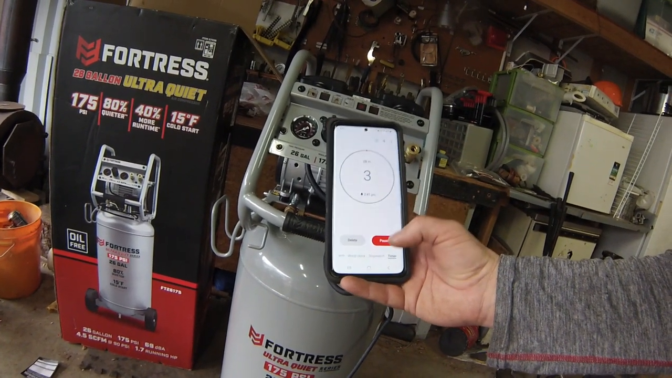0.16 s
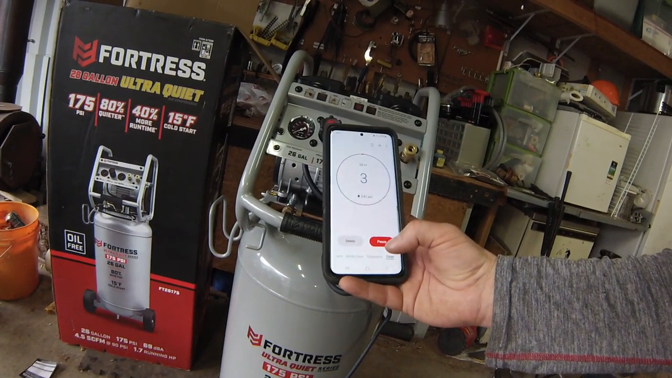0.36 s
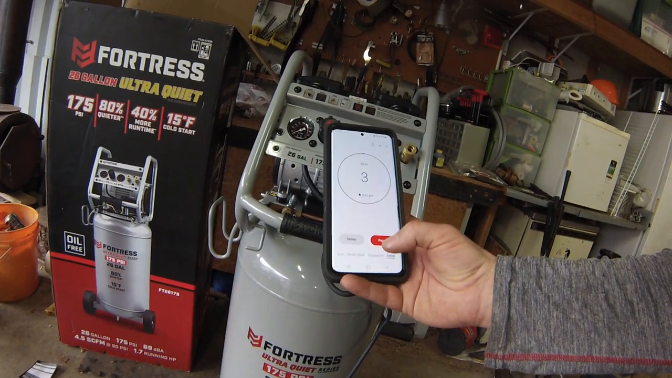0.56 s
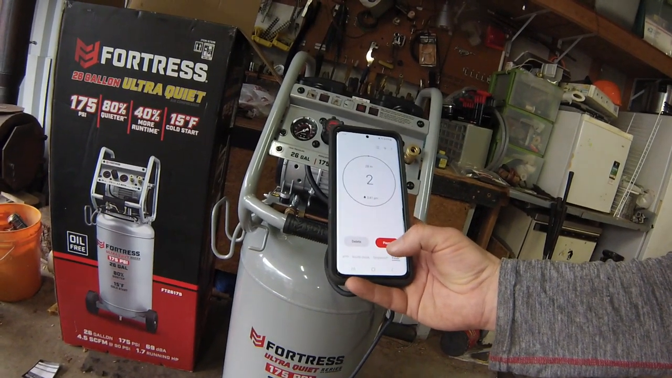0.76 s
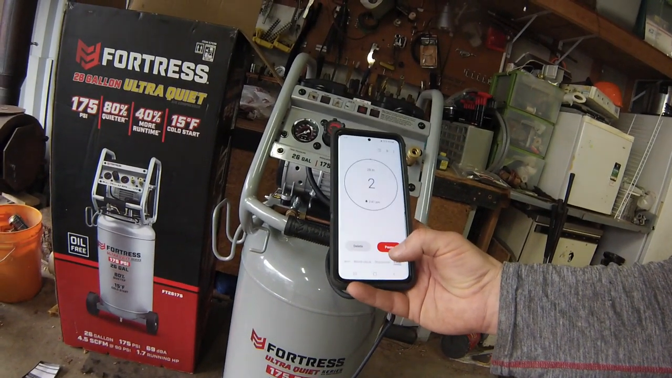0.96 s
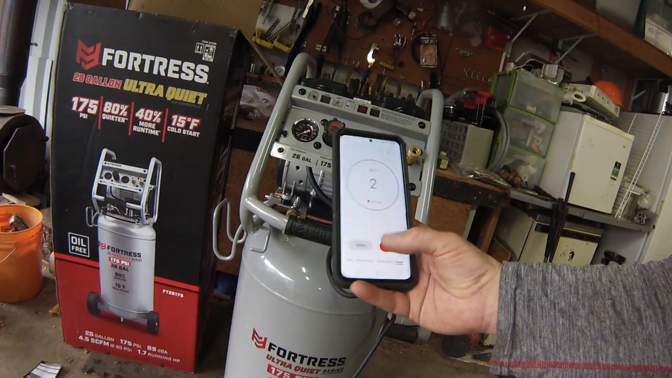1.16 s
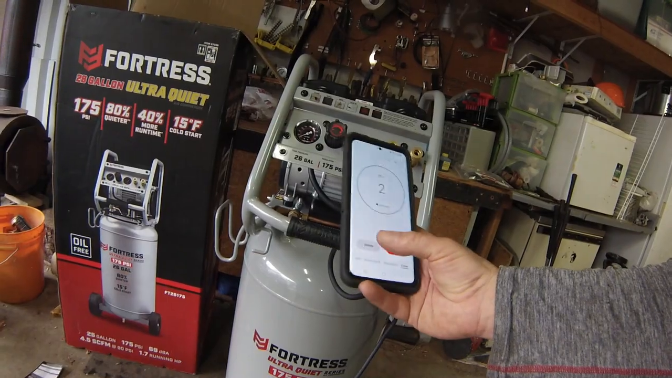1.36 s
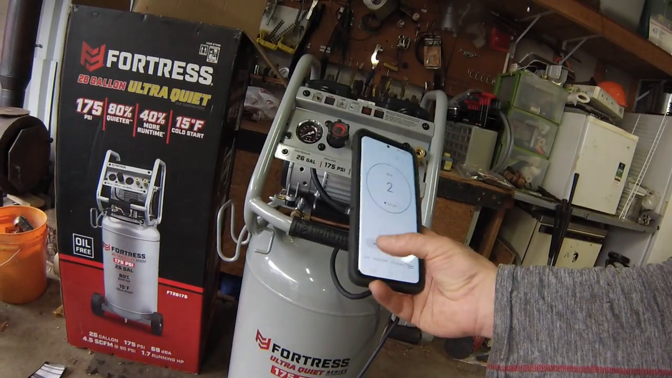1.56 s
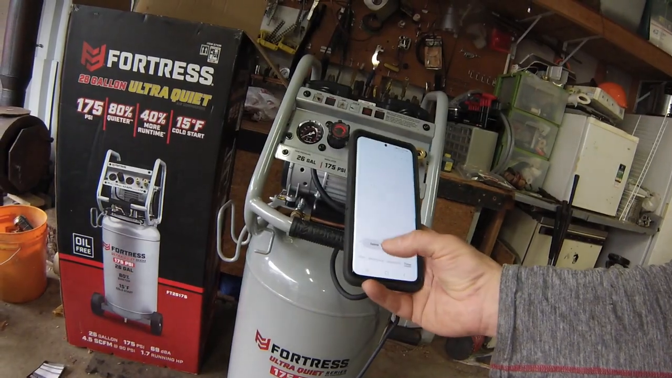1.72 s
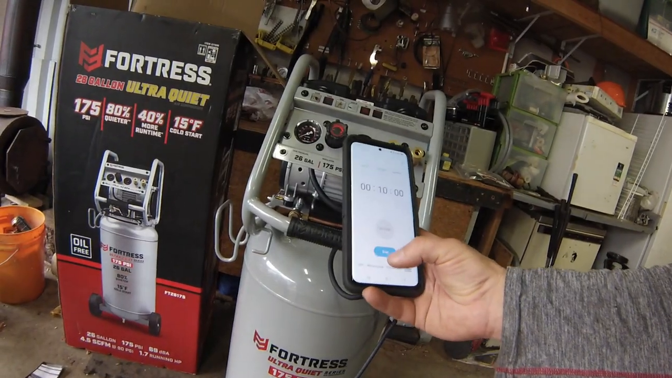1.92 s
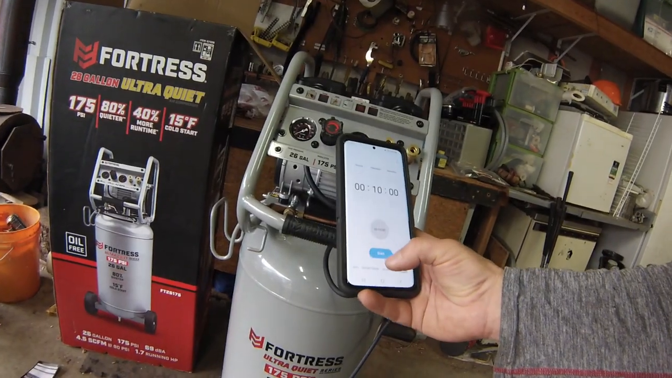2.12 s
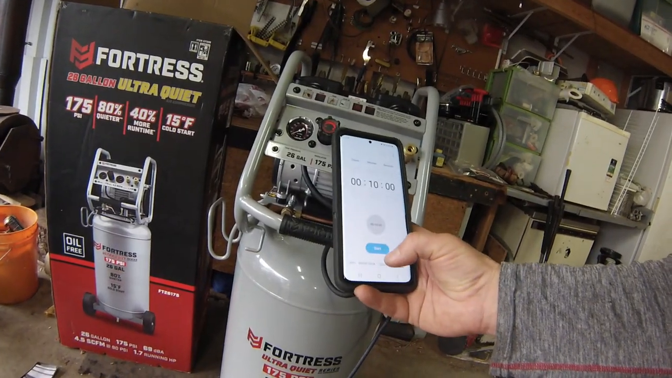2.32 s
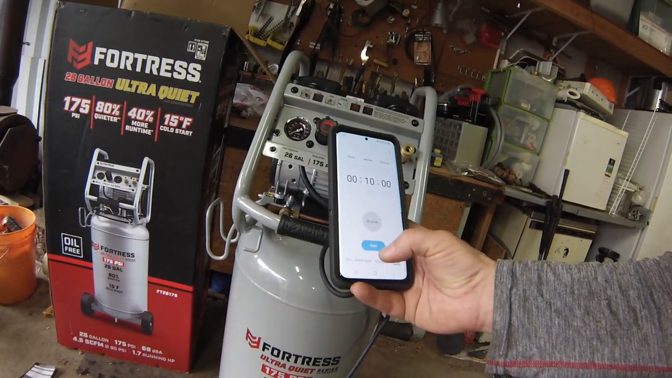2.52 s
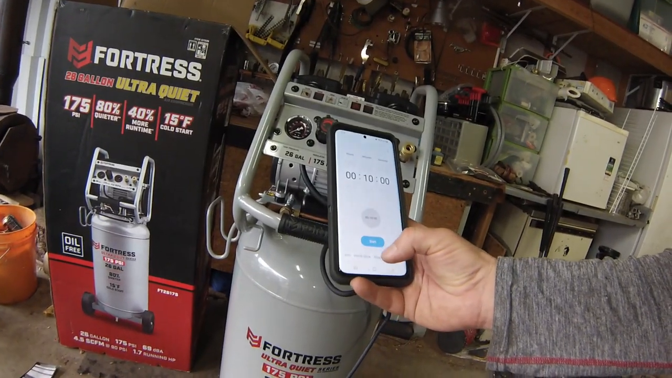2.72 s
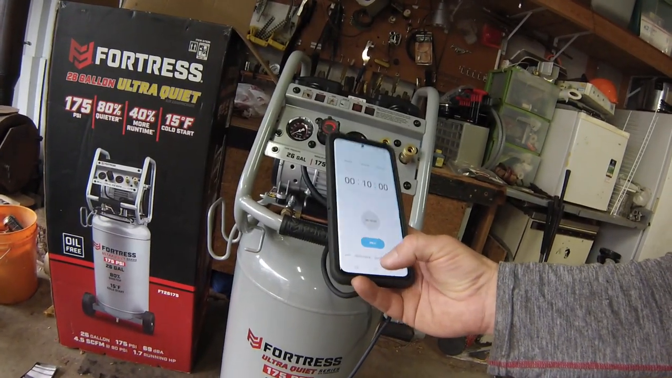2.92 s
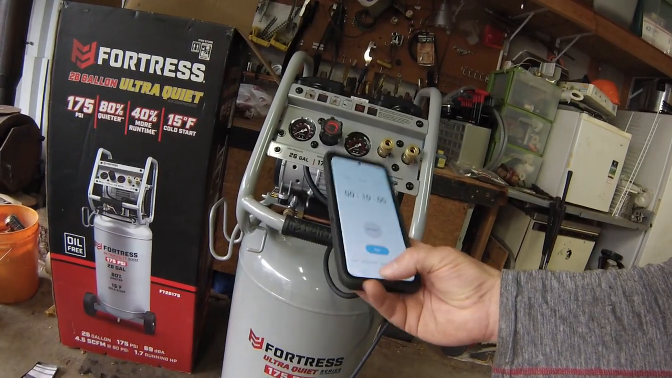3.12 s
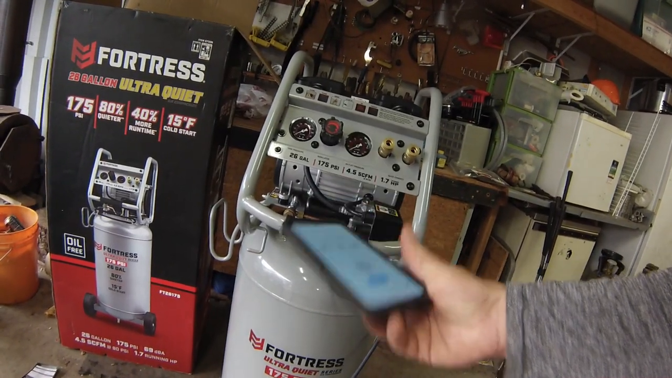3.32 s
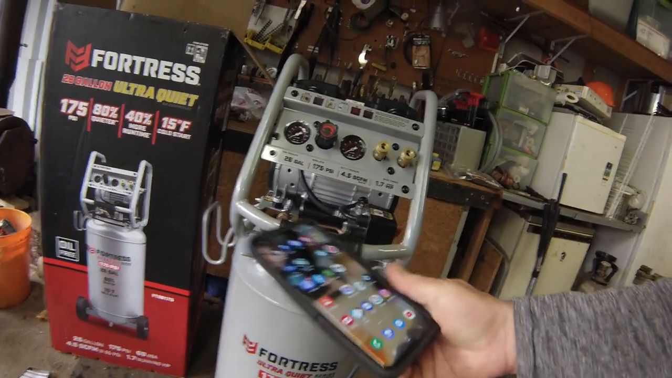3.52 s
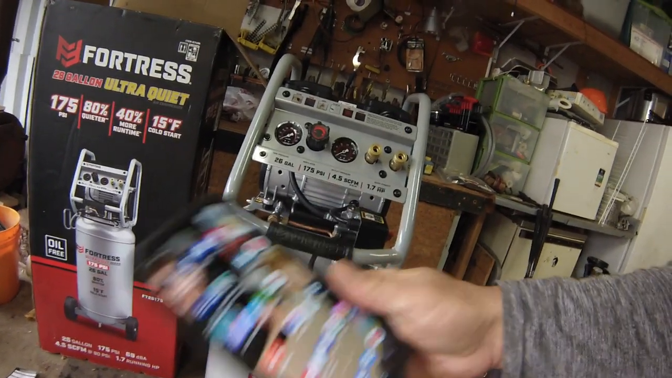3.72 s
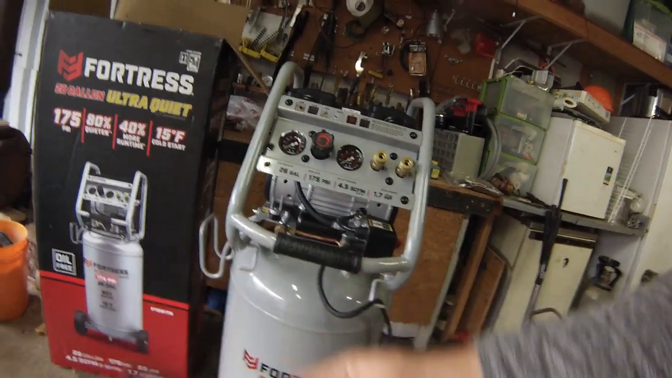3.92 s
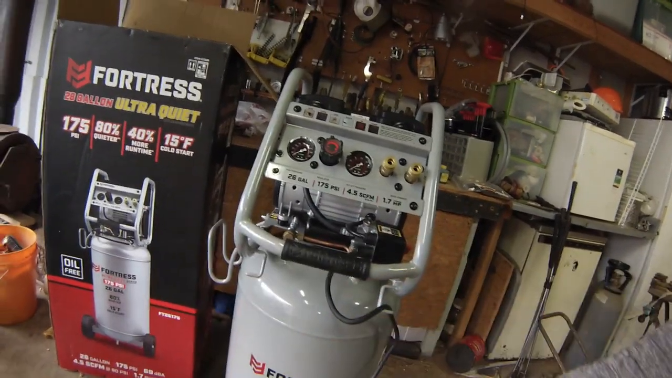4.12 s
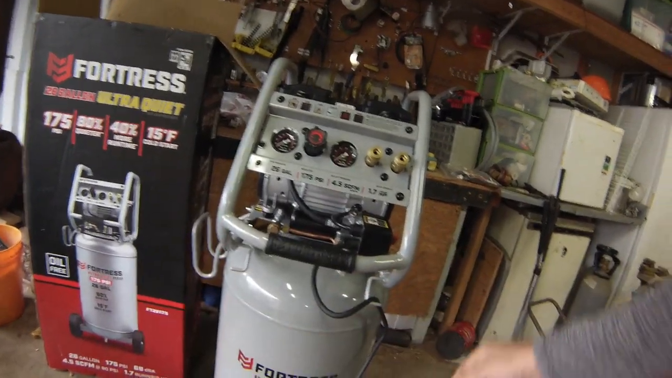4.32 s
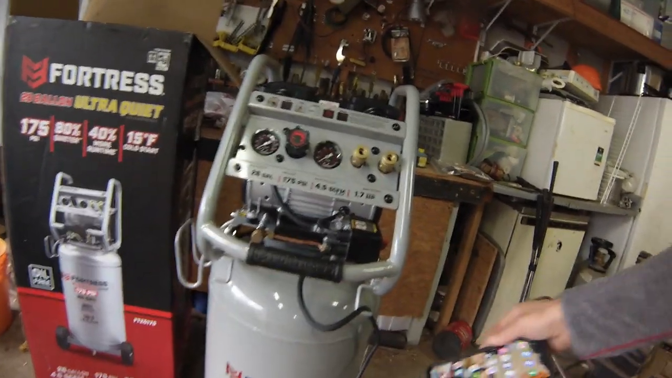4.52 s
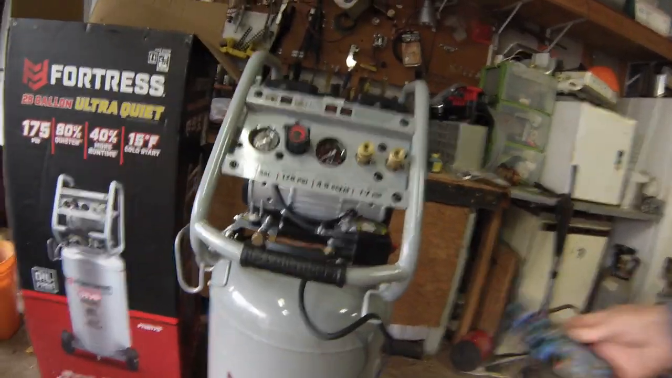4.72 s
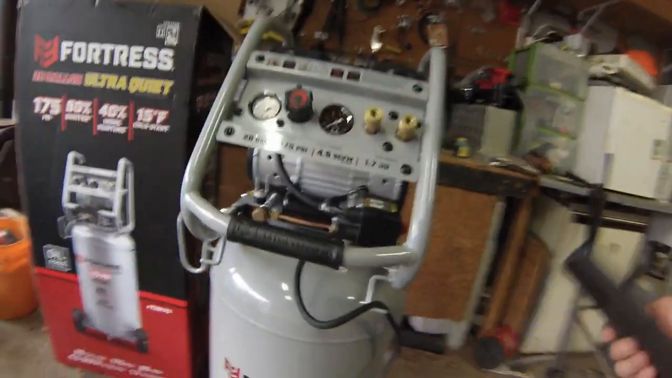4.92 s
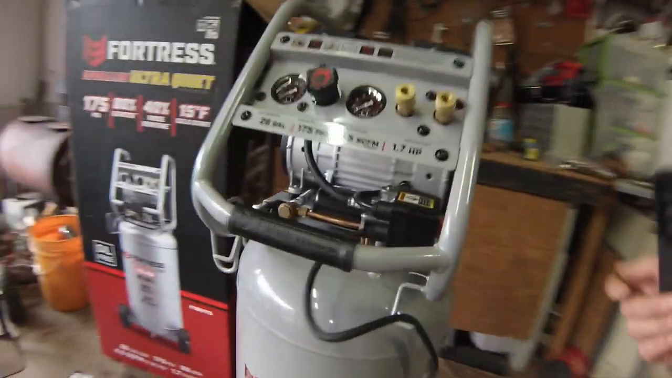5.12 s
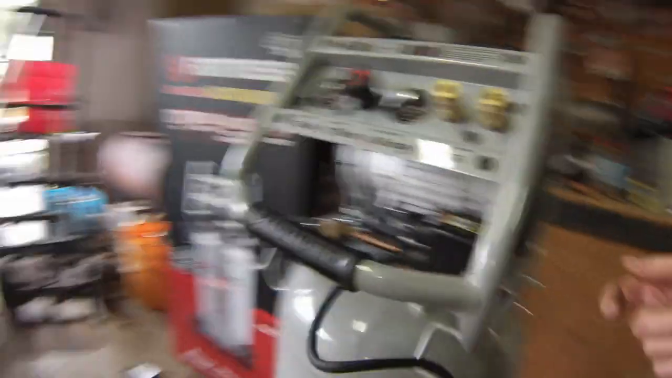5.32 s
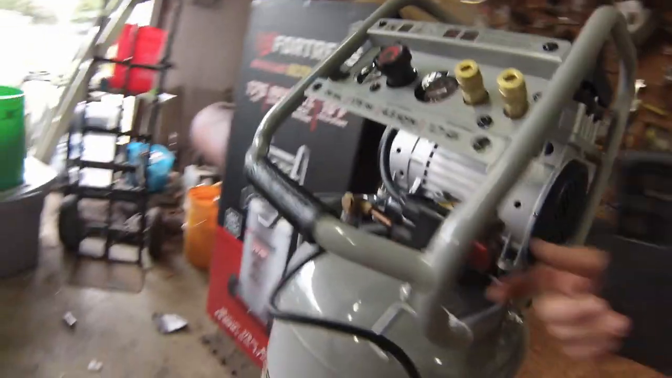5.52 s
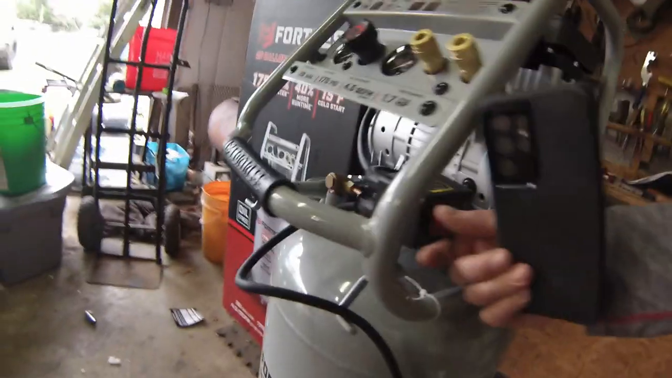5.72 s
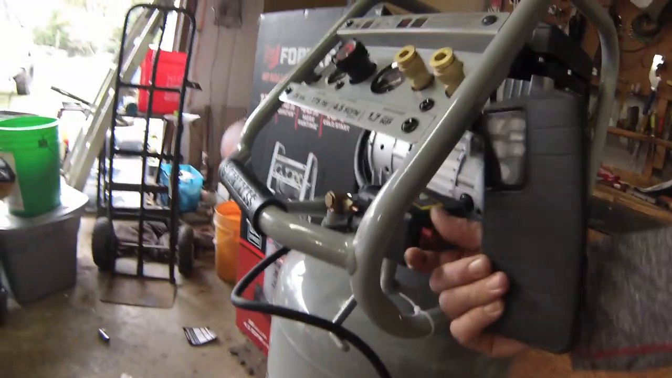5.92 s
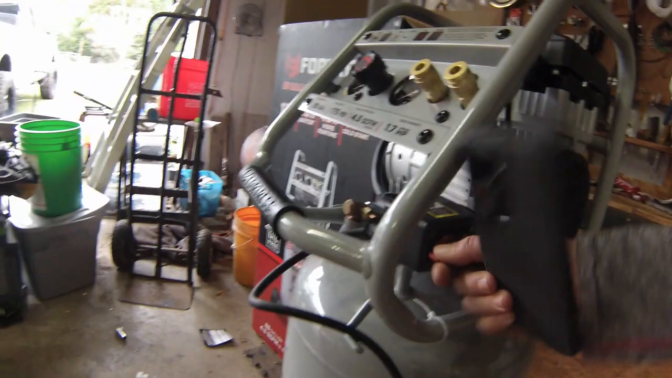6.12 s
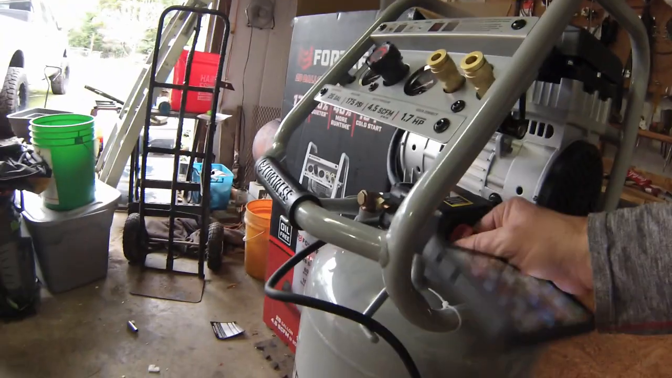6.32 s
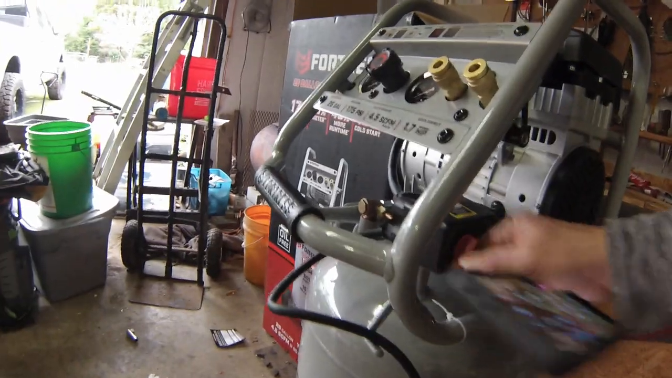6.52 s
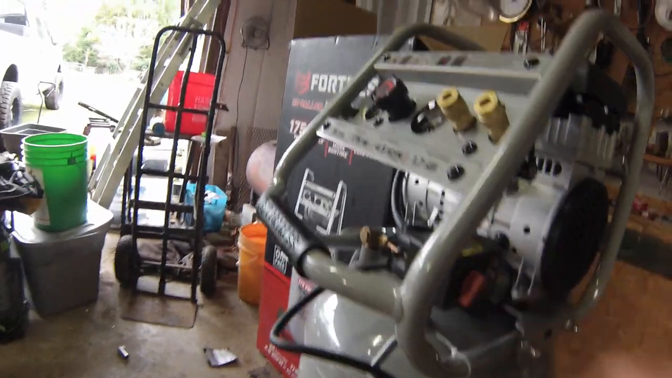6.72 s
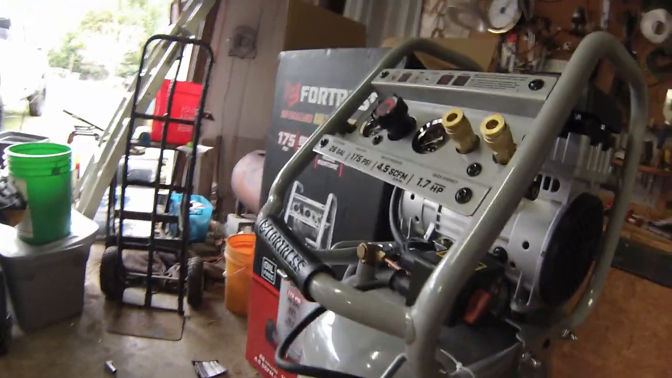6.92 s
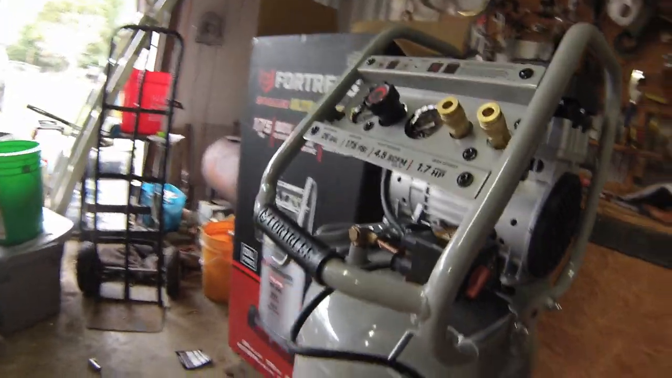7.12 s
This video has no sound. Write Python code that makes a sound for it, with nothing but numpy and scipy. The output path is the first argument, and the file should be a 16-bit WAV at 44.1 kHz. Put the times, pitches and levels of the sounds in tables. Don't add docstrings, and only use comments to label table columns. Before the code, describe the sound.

An electric piston air compressor throbs loudly and steadily in a workshop, then switches off with a few slowing strokes, a knob snap and hissing air.

```python
import sys
import numpy as np
from scipy import signal
from scipy.fft import rfft, irfft, next_fast_len
from scipy.io import wavfile
from scipy.ndimage import uniform_filter1d

SR = 44100
rng = np.random.default_rng(int(sys.argv[2]) if len(sys.argv) > 2 else 0)


def wav_out(sig):
    wavfile.write(sys.argv[1], SR, np.round(np.clip(np.atleast_2d(sig).T, -1, 1) * 32767).astype(np.int16))


def linear_from_db(decibels):
    return 10 ** (np.asarray(decibels, float) / 20)


N = 316195
T = np.arange(N) / SR
SHAFT_HZ, OFF_S, LAST_STROKE_S = 29.29, 6.178, 6.1775
COAST_S = 0.23
SWING_START_S, SWING_S = 4.55, 0.63


def level(x, db=0):
    return x * linear_from_db(db) / np.sqrt(np.mean(x ** 2))


def noise(spectrum, peaks=(), lo_hz=0, hi_hz=SR):
    size = next_fast_len(N, True)
    f = np.fft.rfftfreq(size, 1 / SR) + 1
    hz_points, db_points = np.array(spectrum).T
    db = np.interp(np.log(f), np.log(hz_points), db_points, left=-90, right=-90)
    for hz, width, top_db in peaks:
        db = db + top_db / (1 + (2 * (f - hz) / width) ** 2)
    band = (f >= lo_hz) * (f < hi_hz)
    return irfft(rfft(rng.standard_normal(size)) * linear_from_db(db) * band, size)[:N]


def blend(front, side, share, *more):
    front_part = np.sqrt(1 - share) * level(noise(front, *more))
    return front_part + np.sqrt(share) * level(noise(side, *more))


def ring(modes, pitch=1.0):
    t = T[:SR // 2]
    return sum(linear_from_db(db) * np.sin(2 * np.pi * hz * pitch * t) * 1000. ** (-t / t60) for hz, db, t60 in modes)


def add(out, s, x):
    i = int(s * SR)
    out[i:i + len(x)] += x[:N - i]


def walk(rate):
    hold_ms = int(1000 / rate)
    steps = np.repeat(rng.standard_normal(int(T[-1] * 1000) // hold_ms + 2), hold_ms)
    slow = level(uniform_filter1d(uniform_filter1d(steps, hold_ms), hold_ms))
    return np.interp(T * 1000, np.arange(len(slow)), slow)


def after(s):
    return np.clip(T - s, 0, None)


def view(swing, front_db, side_db):
    return front_db + swing * (side_db - front_db)


def room(x):
    t60_s, first_echo_s, wet_db = .4, .004, -12
    t = T[:SR // 2]
    tail = rng.standard_normal(SR // 2) * 1000. ** (-t / t60_s) * (t > first_echo_s)
    tail = signal.lfilter([.4], [1, -.6], tail)
    return signal.fftconvolve(x, tail / np.linalg.norm(tail))[:N] * linear_from_db(wet_db)


# f/Hz, rms level/dB
TONES = [(232.8, -54), (683.7, -77), (990.5, -56), (1217, -54.5)]


def shop_tones():
    return sum(linear_from_db(db + 3.0 + .7 * walk(3.3)) * np.sin(2 * np.pi * hz * T) for hz, db in TONES)


# t/s, level/dB, f/Hz
HAND_BUMPS = [
    (1.3, -38, 70),
    (3.61, -40, 45),
    (6.355, -40, 55),
    (6.52, -50, 30),
]


def hand():
    out = np.zeros(N)
    for s, db, hz in HAND_BUMPS:
        add(out, s, linear_from_db(db) * ring([(hz, 0, .12)]))
    return out


def unloader_open():
    return np.clip((T - OFF_S) / .12 + 0.62, 0, 1)


# f/Hz, level/dB per Hz
LEAK_COLOUR = [(20, -7), (150, -15), (430, -10), (880, -3), (1300, -9.5), (2200, -8), (3200, -7),
               (4000, -12), (5600, -11.5), (7500, -16), (8200, -12.5), (11200, -16), (12000, -23),
               (15300, -24)]
# f/Hz, width f/Hz, level/dB
LEAK_PEAKS = [(2570, 460, -17), (4830, 500, 6), (900, 170, 3), (13700, 500, 3)]


def leak():
    base_db, surge_db, settle_s = -46, 8, 0.45
    db = base_db + surge_db * np.exp(-after(OFF_S) / settle_s) + 0.7 * walk(30)
    return level(noise(LEAK_COLOUR, LEAK_PEAKS), 2.7) * linear_from_db(db) * (0.22 + 0.76 * unloader_open())


# f/Hz, level/dB per Hz
WHISTLE_COLOUR = [(7400, -30), (7900, -6), (8150, 0), (8500, -6), (9300, -24)]


def whistle():
    start_db, sag_db_s, end_s, fall_db_s = -44.5, 17, 6.7, 45
    db = start_db - sag_db_s * after(OFF_S) - fall_db_s * after(end_s)
    return level(noise(WHISTLE_COLOUR)) * linear_from_db(db) * unloader_open()


# f/Hz, level/dB per Hz
VENT_COLOUR = [(400, -28), (700, -4), (950, 0.5), (1300, -13), (1900, -11), (2550, -25), (3400, -10.5),
               (4300, -24), (5000, -18), (7000, -24), (8200, -23.5), (11000, -27), (12200, -40),
               (15300, -48)]
# f/Hz, width f/Hz, level/dB
VENT_JETS = [(3550, 350, 8)]


def vent():
    top_db, peak_s, hold_s, rise_db_s, fall_db_s = -35.5, 6.306, 0.092, 22, 75
    db = top_db - rise_db_s * np.clip(peak_s - T, 0, None) - fall_db_s * after(peak_s + hold_s)
    return level(noise(VENT_COLOUR, VENT_JETS), 4.4) * linear_from_db(db + 1.6 * walk(100)) * unloader_open()


# t/s, level/dB
SNAPS = [
    (6.3524, 4),
    (6.3549, -5),
    (6.3571, -8),
]
# f/Hz, level/dB, time to fade by 60 dB t/s
KNOB_MODES = [(1120, 0, .009), (720, -12, .03), (480, -21, .02), (930, -17, .12), (1750, -12, .025),
              (2100, -17, .02), (3500, -20, .015), (5000, -23, .008), (7300, -26, .005), (9000, -26, .01),
              (11000, -24, .004)]
# f/Hz, level/dB per Hz
CRACK_COLOUR = [(500, -6), (900, 0), (1300, -6), (1800, -2), (2200, -8), (2600, -18), (3600, -8),
                (6000, -18), (9000, -18), (12000, -26), (14000, -40)]


def knob():
    out, t = np.zeros(N), T[:SR // 2]
    for s, db in SNAPS:
        blow = ring(KNOB_MODES, 1 + .02 * rng.standard_normal())
        add(out, s, linear_from_db(db) * (1 - np.exp(-t / .0006)) * blow)
    crack_and_rattle = linear_from_db(-22) * np.exp(-t / .003) + linear_from_db(-29) * np.exp(-t / .035)
    add(out, SNAPS[0][0], level(noise(CRACK_COLOUR))[:len(t)] * crack_and_rattle)
    add(out, 6.243, linear_from_db(-28) * ring([(1290, 0, .03), (1850, 0, 0.027)]))
    return out


# f/Hz, rms level/dB, wander f/Hz
WHINE_LINES = [(1640, -41, 5), (1952, -55, 8), (3400, -54, 10), (1217, -48, 1), (1064, -39, 3)]


def whines(swing):
    out = 0
    for hz, db, wander in WHINE_LINES:
        loudness = linear_from_db(db + 3 + 2.5 * walk(12))
        out = out + loudness * np.sin(2 * np.pi * np.cumsum(hz + wander * walk(20)) / SR)
    return out * (1 - 0.71 * swing) * (T < OFF_S)


# f/Hz, level/dB per Hz
RUMBLE_COLOUR = [(12, -45), (20, -12), (48, -15), (119, -22), (162, -14), (236, -11), (316, -12.5),
                 (412, -3.5), (560, -10.5), (730, -49), (1230, -120)]


def rumble(swing):
    hold_s, fall_s = 0.18, .06
    sway = np.exp(-after(OFF_S + hold_s) / fall_s)
    return sway * level(noise(RUMBLE_COLOUR), -44) * linear_from_db(4.4 * swing)


def fan_spin():
    return np.exp(-after(OFF_S) / 0.011)


# f/Hz, level/dB per Hz
HISS_FRONT = [(1470, -33), (2500, -21), (2620, -12), (2740, -3), (3440, 0), (3970, -5), (5060, -1),
              (5670, -10.5), (6490, -6), (7110, -17), (7560, -4.5), (8790, 0.5), (9930, -4.5),
              (11000, -4.5), (15300, -25)]
# f/Hz, level/dB per Hz
HISS_FROM_SIDE = [(1470, -31.5), (2500, -6), (2740, -8), (2950, 1), (3460, 1.5), (4450, -0.5), (4940, 3.5),
                  (5890, -5.5), (6400, -2.5), (7200, -6), (8930, 0), (11000, -3), (12300, -11.5),
                  (13900, -14), (15300, -19)]
# f/Hz, width f/Hz, level/dB
REED_PEAKS = [(3426, 35, -1), (3163, 68, 3), (3940, 67, 2), (4960, 120, 0)]


def valve_hiss(turn, swing):
    hiss_swing_start_s, hiss_swing_s = 3.91, 1.3
    hiss_swing = np.clip(after(hiss_swing_start_s) / hiss_swing_s * (1 + .3 * walk(4.3)), 0, 1)
    pulse_db = .55 * (1 - .7 * swing) * np.cos(4 * np.pi * (turn - .35))
    db = view(swing, -39.5, -38) + pulse_db + .3 * walk(150)
    return fan_spin() ** .3 * blend(HISS_FRONT, HISS_FROM_SIDE, hiss_swing, REED_PEAKS) * linear_from_db(db)


# f/Hz, level/dB per Hz
ROAR_FRONT = [(520, -22), (600, -26), (700, -16.5), (800, -8.5), (850, -2.5), (910, 3.5), (950, -10),
              (1050, -12.5), (1110, -24.5), (1400, -26), (1620, -19), (1800, -23.5), (2100, -25),
              (2600, -46)]
# f/Hz, level/dB per Hz
ROAR_SIDE = [(310, -53), (520, -33), (579, -17), (636, -15.5), (695, -14), (833, 2), (885, 3), (1040, -6),
             (1160, -20), (1260, -18), (1510, -21.5), (1600, -20.5), (1700, -13.5), (2070, -28),
             (2600, -40.5), (3380, -71.5), (5720, -120)]
# f/Hz, width f/Hz, level/dB
CASING_PEAKS = [(780, 25, 4), (810, 14, -5), (940, 20, 3), (1640, 50, 6), (1692, 12, 5), (1730, 30, -5),
                (1950, 50, 5)]


def cooling_air(turn, swing, roar_db):
    split_hz = 1150
    once, twice = np.cos(2 * np.pi * (turn - .2)), np.cos(4 * np.pi * (turn - .1))
    low_db = roar_db + .7 * once + .6 * twice + .4 * walk(60)
    high_db = view(swing, -33, -31.5) + .6 * once + .7 * walk(80)
    low = blend(ROAR_FRONT, ROAR_SIDE, swing, CASING_PEAKS, 0, split_hz) * linear_from_db(low_db)
    high = blend(ROAR_FRONT, ROAR_SIDE, swing, CASING_PEAKS, split_hz, SR) * linear_from_db(high_db)
    return fan_spin() * (low + high)


def motor_on():
    return np.clip((OFF_S + 0.006 - T) / .012, 0, 1)


# multiple of the mains, crank orders added, front level/dB, side level/dB
HUM_LINES = [(2, 0, -41, -45), (2, 1, -58, -51), (2, 2, -48, -45), (2, 3, -54, -47), (4, 0, -48, -44),
             (4, 1, -51, -46), (4, 3, -56, -56), (6, 0, -54, -58), (8, 3, -50, -48)]


def motor_hum(turn, swing):
    mains_hz = 59.975
    out = 0
    for multiple, order, db, side_db in HUM_LINES:
        loudness = linear_from_db(view(swing, db, side_db) + 0.21 * walk(2.25))
        out = out + loudness * np.sin(2 * np.pi * (multiple * mains_hz * T + order * turn))
    return motor_on() * out


SHAKE_FRONT = [-10, 0, -25, -25, -30, -7, -26, -24, -23, -10, -25, -13]
SHAKE_FROM_SIDE = [-3, 0, -32, -14, -32, -12, -24, -20, -16, -9, -15, -8]


def frame_shake(turn, swing):
    coast_db = -9
    shake = 0
    for order, (db, side_db) in enumerate(zip(SHAKE_FRONT, SHAKE_FROM_SIDE), 1):
        loudness = linear_from_db(view(swing, db, side_db) + 0.5 * walk(3.13))
        shake = shake + loudness * np.sin(2 * np.pi * (order * turn + rng.random()))
    on = motor_on()
    dying = np.clip(1 - after(OFF_S) / COAST_S, 0, 1) ** .5
    return (on + (1 - on) * linear_from_db(coast_db) * dying) * shake * linear_from_db(view(swing, -43, -40) + 2.5)


# peak t/s, f/Hz, peak level/dB, fall t/s
COAST_STROKES = [(6.198, 420, -21, 0.0099), (6.225, 440, -20, 0.007), (6.255, 410, -30, 0.0058),
                 (6.264, 958, -22.5, 0.014), (6.285, 450, -22.5, 0.016), (6.295, 956, -29, .008),
                 (6.324, 984, -32, 0.013), (6.335, 427, -24, 0.0086), (6.394, 476, -25.5, 0.0045),
                 (6.417, 675, -28, 0.0051), (6.455, 473, -35, 0.011), (6.465, 967, -28, 0.02),
                 (6.484, 468, -27.5, 0.037)]


def coasting():
    rise_s, rise_grows = 0.0075, 0.016
    out = np.zeros(N)
    for s, hz, db, fall in COAST_STROKES:
        rise = rise_s + rise_grows * (s - OFF_S)
        t = T[:SR // 3] - 3 * rise
        swell = np.where(t < 0, np.exp(-(t / rise) ** 2), np.exp(-t / fall))
        add(out, s - 3 * rise, linear_from_db(db) * swell * np.sin(2 * np.pi * hz * t))
    return out


# f/Hz, level/dB, time to fade by 60 dB t/s
HEAD_MODES = [(900, 0, .1)]


def head_knocks(turn, roar_db):
    new_turn = np.diff(np.floor(turn), prepend=np.floor(turn[0])) > 0
    blows = new_turn * (T < OFF_S) * linear_from_db(.5 * walk(29))
    return level(signal.fftconvolve(blows, ring(HEAD_MODES))[:N], -11) * linear_from_db(roar_db)


SILENCER_FRONT = [-8, 0, -6, -4, -9, -20]
SILENCER_FROM_SIDE = [-8.5, 2, -7, -7.5, -28, -26]


def silencer(turn, swing):
    smear = .4
    out = 0
    for order, db, side_db in zip(range(13, 19), SILENCER_FRONT, SILENCER_FROM_SIDE):
        lag = smear * (1 - swing / 2) * (order - 15 + swing) ** 2
        loudness = linear_from_db(view(swing, db, side_db) + 0.86 * walk(4.33))
        out = out + loudness * np.sin(2 * np.pi * order * turn + lag)
    return motor_on() * out * linear_from_db(view(swing, -32, -29.5) + 1.0)


def crank():
    coasted_s = COAST_S * (1 - np.exp(-after(OFF_S) / COAST_S))
    return SHAFT_HZ * (T - LAST_STROKE_S - after(OFF_S) + coasted_s) + 0.0035 * walk(0.84)


def scene():
    swing = np.clip(after(SWING_START_S) / SWING_S, 0, 1)
    roar_db = view(swing, -18.5, -19) - 2 * np.sin(np.pi * swing)
    turn = crank()
    close = hand() + knob()
    noisy = whines(swing) + rumble(swing) + valve_hiss(turn, swing) + cooling_air(turn, swing, roar_db)
    escaping = leak() + whistle() + vent()
    pump = motor_hum(turn, swing) + frame_shake(turn, swing) + head_knocks(turn, roar_db) + silencer(turn, swing)
    return (shop_tones() + room(noisy + .3 * close) + close + escaping + noisy + coasting() + pump)[None]


def band_limit(x):
    return signal.sosfilt(signal.butter(12, 15440, fs=SR, output="sos"), x)


def record(dry):
    return band_limit(dry)


dry = scene()
out = record(dry)
wav_out(out)
```